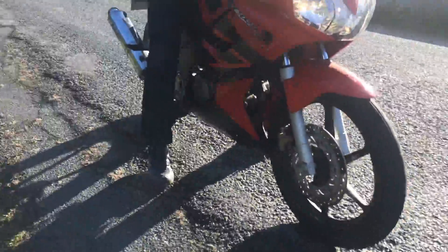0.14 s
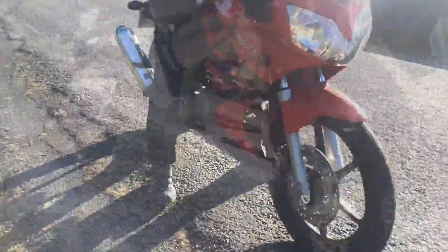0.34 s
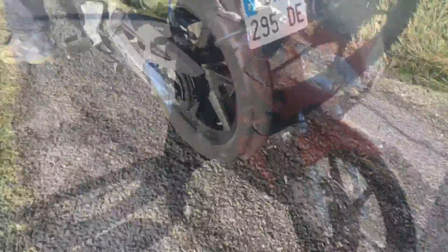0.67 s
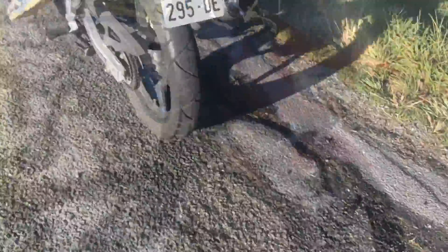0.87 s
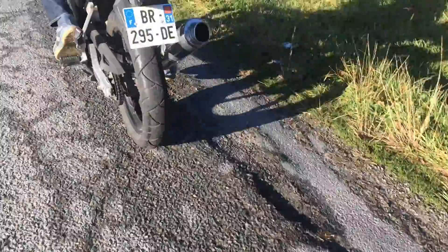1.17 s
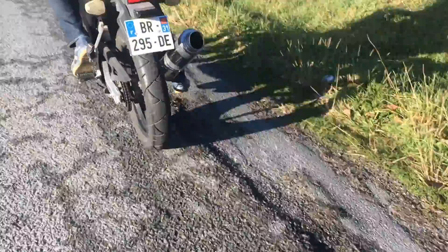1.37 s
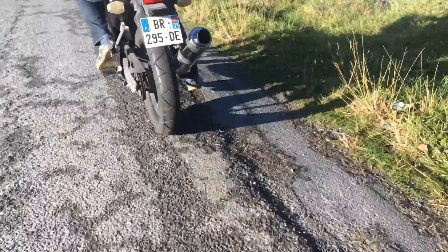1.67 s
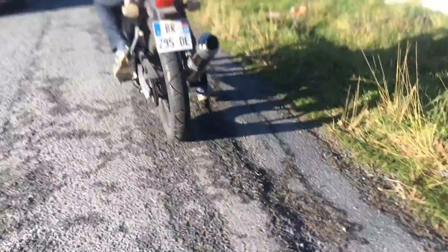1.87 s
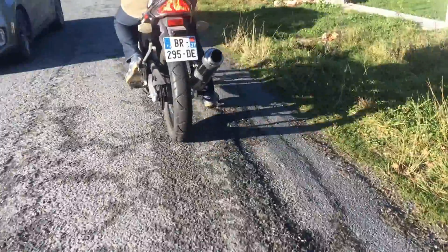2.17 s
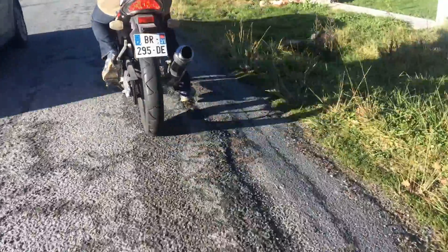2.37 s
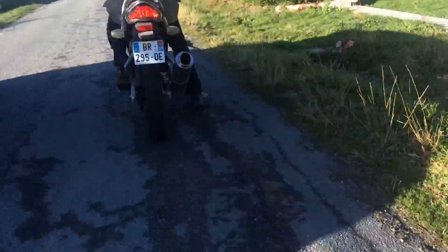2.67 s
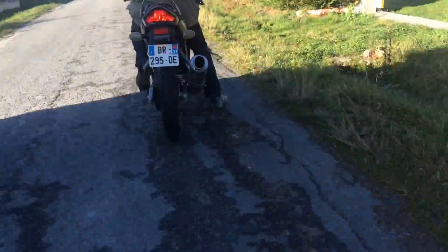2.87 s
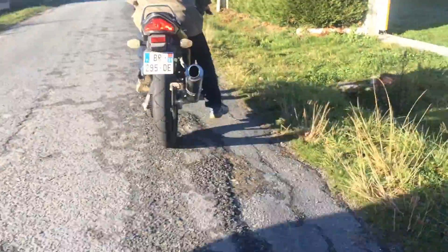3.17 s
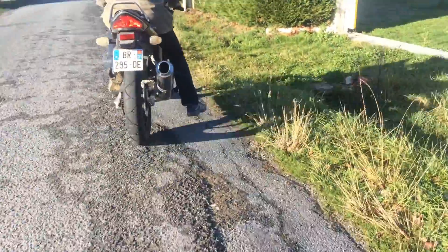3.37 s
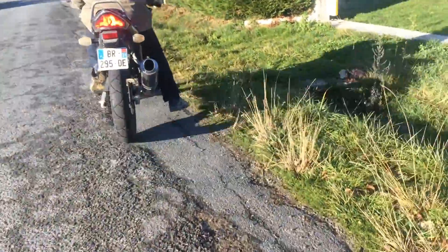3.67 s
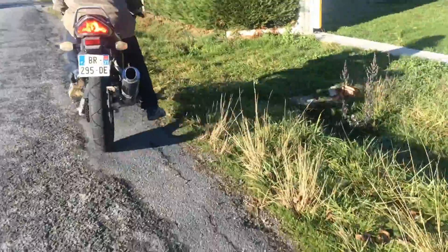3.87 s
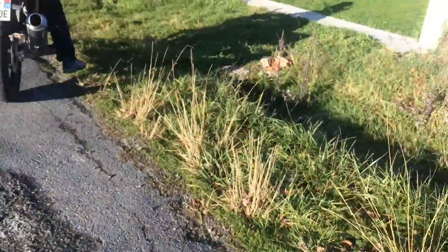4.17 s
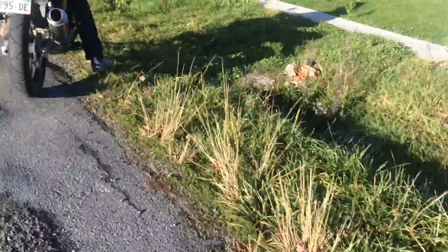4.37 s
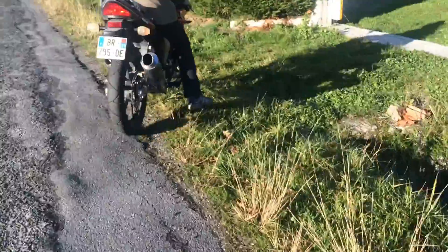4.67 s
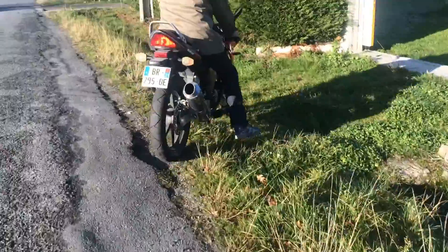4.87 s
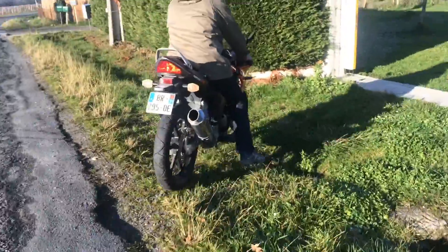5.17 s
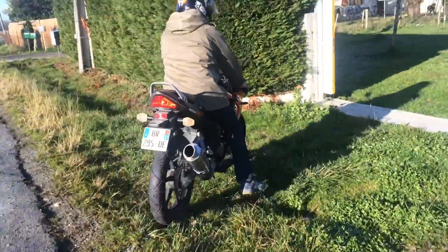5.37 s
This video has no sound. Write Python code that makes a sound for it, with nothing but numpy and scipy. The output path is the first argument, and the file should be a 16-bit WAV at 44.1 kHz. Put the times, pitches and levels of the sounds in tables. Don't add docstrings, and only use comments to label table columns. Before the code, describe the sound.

A small single-cylinder motorcycle blips its throttle up close, revs again from behind, then sinks into a slow, thumping, raspy idle as a car passes.

```python
import sys
import numpy as np
from scipy import signal
from scipy.io import wavfile
from scipy.ndimage import uniform_filter1d

SR = 44100
rng = np.random.default_rng(int(sys.argv[2]) if len(sys.argv) > 2 else 0)


def store_pcm(level_fs):
    pcm = np.round(np.clip(level_fs, -1, 1) * 32767).astype(np.int16)
    wavfile.write(sys.argv[1], SR, np.atleast_2d(pcm).T)


def field_ratio(decibels):
    return 10 ** (np.asarray(decibels, dtype=float) / 20)


N = 243873
TIME = np.arange(N) / SR


def evened(x):
    return x / np.sqrt(np.mean(x ** 2) + 1e-20)


def curve(start, rise, hold, top_db, sag_db, end, release=.01):
    t = TIME - start
    sag = sag_db * np.maximum(t - rise - hold, 0)
    let_go = np.clip((end - start - t) / release + 1, 0, 1)
    return np.clip(t / rise, 0, 1) * field_ratio(top_db - sag) * let_go


def hiss(spectrum, patchy_db, size=512):
    hz = np.fft.rfftfreq(size, 1 / SR)
    f, db = np.transpose(spectrum)
    a, b, patches = rng.standard_normal((N * 4 // size + 5, len(hz), 3)).T
    patches = uniform_filter1d(patches, size=6, axis=0)
    patches = evened(uniform_filter1d(patches, size=16, axis=1))
    colour = np.interp(np.log(hz + 1), np.log(f + 1), db, -90, -90)[:, None]
    z = (a + 1j * b) * field_ratio(colour + patchy_db * patches)
    return evened(signal.istft(z, nperseg=size, noverlap=size * 3 // 4)[1][:N])


def bursts(times, gains, rise_ms, decay_ms):
    train = np.zeros(N)
    train[np.clip(np.round(times * SR).astype(int), 0, N - 1)] = gains
    slow = np.exp(-1000 / SR / decay_ms)
    fast = slow * np.exp(-1000 / SR / rise_ms)
    return signal.lfilter([slow - fast], np.poly([slow, fast]), train)


def ring(x, hz, width):
    r = np.exp(-np.pi * width / SR)
    section = [1, 0, -1.018, 1, -2 * r * np.cos(2 * np.pi * hz / SR), r ** 2]
    return signal.sosfilt(2 * [section], x)


def add(mix, times, waves):
    for start, wave in zip(np.round(times * SR).astype(int), waves):
        mix[start:start + len(wave)] += wave


def cycle(rate, wait):
    s, hz = np.transpose(rate)
    t = np.arange(round(s[0] * SR), min(round(s[-1] * SR), N)) / SR
    return t, np.cumsum(np.interp(t, s, hz)) / SR - wait


def controls(rate, wait, rows, odd):
    t, turns = cycle(rate, wait)
    at = np.interp(np.arange(int(turns[-1]) + 1), turns, t)
    when, *columns = np.transpose(rows)
    blow_db, aside, mouth_db = (np.interp(at, when, c) for c in columns)
    s, change_db = np.transpose(odd)
    nearest = abs(at[:, None] - s).argmin(0)
    odd_db = (nearest == np.arange(len(at))[:, None]) @ change_db
    return at, blow_db + odd_db, np.clip(aside, 0, 1), mouth_db + odd_db


# Hz, level in dB, t60 in s, arrival in ms, dB change when turned aside.
PIPE_MODES = [(90, .5, .07, 7.2, 0), (136, 7.5, .042, 0, 3), (200, -9, .05, -4.7, 5),
              (292, -6, .045, -1.7, -9), (45, -24, .08, 0, 0), (153, -16, .13, 8.1, 6)]


def pipe_thump(at, blow_db, aside, detune):
    lead = 300
    out, span = np.zeros(N + 8000), np.arange(4000) / SR
    for f, db, t60, ms, turn_db in PIPE_MODES:
        pitch_luck, size_luck = rng.standard_normal((2, len(at), 1))
        w = np.maximum(span - lead / SR - ms / 1000, 0)
        pitch = f * (1 + detune * pitch_luck)
        size = field_ratio((blow_db + db + turn_db * aside)[:, None] + 1.2 * size_luck)
        swell = field_ratio(-60 * w / t60) * (1 - np.exp(-w / .009))
        add(out, at, -size * np.sin(2 * np.pi * pitch * w) * swell)
    silencer = signal.ellip(4, .3, 18, 335, fs=SR, output="sos")
    return signal.sosfiltfilt(silencer, out)[lead:lead + N]


# Hz, width in Hz, level in dB, delay in ms, decay in ms.
RASP_MODES = [(537, 103, -3.5, 6, 6.6), (737, 244, 1.5, 4, 9), (1482, 520, -5, 2, 12.5),
              (2030, 190, -11.5, 2.5, 11.7), (3150, 1150, -10, -3, 6.8)]


def engine(firings, throat, jet, uneven_db, detune):
    at, blow_db, aside, mouth_db = firings
    slower = np.log2(np.gradient(at) / .047)
    rasp_db = -36 + .25 * mouth_db + 4.5 * slower
    spit_db = -36 + .45 * mouth_db + 16 * slower
    blow_db = blow_db + uneven_db * rng.standard_normal(len(at))
    out = pipe_thump(at, blow_db, aside, detune)
    rasp_luck = rng.standard_normal((len(RASP_MODES), len(at)))
    for gas, luck, (_, _, db, ms, decay) in zip(throat, rasp_luck, RASP_MODES):
        gains = field_ratio(rasp_db + db + 1.5 * luck)
        out = out + bursts(at + (ms - 1.5) / 1000, gains, .83, decay) * gas
    spit = bursts(at - .0006, field_ratio(spit_db + 2.2 * rng.standard_normal(len(at))), .6, 1.5)
    slap = bursts(at + .0067, field_ratio(spit_db - 10 + 4 * rasp_luck[-1]), .96, 1.6)
    return out + (spit + slap) * jet


# time in seconds, firings a second.
FRONT_SPEED = [
    (0, 21.67),
    (0.13, 20.9),
    (0.2, 25.62),
    (0.3, 35.63),
    (0.45, 30.44),
    (0.65, 26.82),
    (0.9, 23.55),
    (1.21, 21.34),
]
# time in seconds, blow in dB, pipe turned aside 0-1,
# pipe mouth facing the microphone in dB.
FRONT_EXHAUST = [
    (0, 0, .3, 0),
    (.12, -1, .4, -6),
    (.2, 4.5, .5, 6),
    (.35, 1.5, .7, -8),
    (.55, -4, .4, -22),
    (.9, -3, .3, -22),
    (1.1, -4, .2, -10),
    (1.2, -19, .3, -20),
]
# time in seconds, change in dB.
FRONT_ODD_FIRINGS = [(.148, 2), (.474, -3), (.578, 3), (.65, -5), (.765, -6), (.805, -10), (.888, 5), (.93, 7),
                     (.974, -3), (1.017, 6), (1.062, -2)]


def front_engine(throat, jet):
    firings = controls(FRONT_SPEED, .172, FRONT_EXHAUST, FRONT_ODD_FIRINGS)
    return engine(firings, throat, jet, uneven_db=.8, detune=.018)


# Hz, dB per Hz.
LANE_COLOUR = [(250, -40.5), (420, -20.5), (535, 0.5), (603, -3.5), (792, -9), (893, -11.5), (1190, -11),
               (1630, -8), (2570, -13.5), (11100, -28.5), (15500, -45)]


def lane():
    return field_ratio(-48) * hiss(LANE_COLOUR, patchy_db=.7)


# Hz, dB per Hz.
WIND_COLOUR = [(15, -10), (30, 0), (60, -2), (120, -8), (300, -22), (500, -60)]


def wind():
    return field_ratio(-34) * hiss(WIND_COLOUR, patchy_db=2.5, size=2048)


# Hz, dB per Hz.
ROAR_COLOUR = [(280, -37.5), (480, -3), (571, -11.5), (690, -15), (951, -11.5), (1230, -13.5),
               (1970, -14.5), (2340, -18.5), (13200, -33.5), (15500, -36)]
# start, rise and hold in seconds,
# top in dB, sag in dB a second, end in seconds.
IDLE_SWELL = (-1, .1, 2, -41.5, 0, .2)
BLIP_SWELL = (.175, .03, .17, -31, 9.5, 1.2)
REAR_SWELL = (1.19, .01, .1, -41.5, 9, 2.6)


def roar():
    level = curve(*IDLE_SWELL) + curve(*BLIP_SWELL) + curve(*REAR_SWELL, release=.6)
    pulse = 1 + .22 * np.cos(2 * np.pi * rear_turns())
    return level * hiss(ROAR_COLOUR, patchy_db=1.2) * pulse


# Hz, dB per Hz.
CAR_COLOUR = [(240, -15), (400, -3), (600, -1.5), (832, 1.5), (1270, -2.5), (1700, -5.5), (2950, -18),
              (9830, -29), (15300, -38)]


def car():
    along = (TIME - 2.9) / .5
    distance = np.sqrt(1 + along ** 2)
    falloff = distance ** np.where(along > 0, 2.8, 1.6)
    return field_ratio(-36) / falloff * hiss(CAR_COLOUR, patchy_db=1.8)


# time in seconds, firings a second.
REAR_SPEED = [(0.2, 47.91), (0.4, 41.17), (0.85, 30.06), (1.15, 26.02), (1.75, 22.59), (2.0, 21.77),
              (2.75, 20.86), (3.0, 21.32), (3.25, 20.8), (4.1, 20.37), (4.7, 19.02), (5.12, 18.45),
              (5.3, 18.6), (5.53, 18.32)]
REAR_WAIT = .649


def rear_turns():
    t, turns = cycle(REAR_SPEED, REAR_WAIT)
    return np.interp(TIME, t, turns) - .2


# multiple of the firing rate, level in dB.
ORDERS = [(1, -9), (2, -3), (3, 1.5), (4, -2), (5, -14), (6, -22), (7, -13), (8, -17.5), (9, -22.5),
          (10, -13), (11, -24)]
# start, rise and hold in seconds, top in dB, sag in dB a second, end in seconds.
ORDER_SWELL = (.19, .02, .15, -11, 10, .9)


def overrun():
    turns = rear_turns()
    luck = np.interp(turns + .5, np.arange(200), rng.standard_normal(200))
    orders = sum(field_ratio(db) * np.cos(2 * np.pi * k * turns) for k, db in ORDERS)
    return curve(*ORDER_SWELL, release=.15) * field_ratio(3.5 * luck) * evened(orders)


# time in seconds,
# tick in dB, bang in dB.
CRACKS = [(.198, -26.5, -29), (.232, -45, -20), (0.263, -45, -18), (.291, -28, -20), (0.326, -44, -18),
          (.446, -41, -30), (0.599, -50, -17), (0.75, -26.5, -43), (0.843, -30, -42), (1.198, -23.5, -25),
          (1.440, -40, -19), (1.740, -40, -26), (2.615, -29.5, -38), (2.832, -23, -22), (3.124, -39, -29.5),
          (4.888, -42, -50), (4.937, -38, -36)]


def band_noise(order, low_hz, high_hz):
    band = signal.butter(order, [low_hz, high_hz], "band", fs=SR, output="sos")
    return evened(signal.sosfilt(band, rng.standard_normal(N)))


def pops():
    s, tick_db, bang_db = np.transpose(CRACKS)
    tick = bursts(s, field_ratio(tick_db - 4.5), .18, 2.1) * band_noise(1, 1200, 8000)
    bang = bursts(s, field_ratio(bang_db), 1.1, 4) * band_noise(2, 400, 1600)
    return tick + bang


# time in seconds, blow in dB, pipe turned aside 0-1,
# pipe mouth facing the microphone in dB.
REAR_EXHAUST = [(.2, -16, .4, 13), (.42, -20, .35, -4), (.5, -1, .28, -14), (.8, -2.5, .3, -12),
                (.95, -1, .35, 10), (1.2, 1, .5, 12), (1.4, -.5, .7, 13), (1.5, 0, .9, 11),
                (1.75, .5, .55, 9), (1.9, .5, .2, 3), (2.1, 1.5, .3, 1.5), (2.9, 0, 0, 0),
                (3.8, .3, .13, -2), (4.7, 1, .35, -2), (5.0, 1, .5, 0), (5.25, -1, 1, 3),
                (5.53, -2.5, 1, 4)]
# time in seconds, change in dB.
REAR_ODD_FIRINGS = [(.599, 3), (.627, -3), (.655, -3), (.714, -5), (.744, 2), (.807, -8), (.907, -5),
                    (1.011, -3), (1.047, -4), (1.084, -5), (1.16, 1), (1.521, -8), (1.606, -5), (1.829, -4.5)]


def rear_firings():
    return controls(REAR_SPEED, REAR_WAIT, REAR_EXHAUST, REAR_ODD_FIRINGS)


def rear_engine(throat, jet):
    return engine(rear_firings(), throat, jet, uneven_db=.6, detune=.024)


# Hz, level in dB, t60 in s, arrival in ms, slide as a share.
CAN_MODES = [(532, -2, 0.054, 6.26, 0.073), (629, -4.5, .04, 3.03, 0.23), (799, -10, 0.052, 1.87, 0.14),
             (1618, -19, 0.03, 1.977, 0.02), (1405, -16.5, 0.042, 3.03, .03)]


def can():
    at, *_, mouth_db = rear_firings()
    out, w = np.zeros(N + 8000), np.arange(3000) / SR
    for hz, db, t60, ms, slide in CAN_MODES:
        size_luck, pitch_luck = rng.standard_normal((2, len(at), 1))
        swept = w - slide * .0089 * (1 - np.exp(-w / .0036))
        size = field_ratio(-24.5 + mouth_db[:, None] + db + 1.5 * size_luck)
        pitch = hz * (1 + .015 * pitch_luck)
        swell = field_ratio(-60 * w / t60) * (1 - np.exp(-w / .004))
        add(out, at + ms / 1000, size * np.sin(2 * np.pi * pitch * swept) * swell)
    return out[:N]


# start, rise and hold in seconds, top in dB, sag in dB a second, end in seconds.
AIRBOX_SWELL = (.2, .02, .12, -22.5, 7, 1.4)


def airbox():
    at = rear_firings()[0]
    out, w = np.zeros(N + 8000), np.arange(3000) / SR
    pitch = 410 * (.03 / np.gradient(at)[:, None]) ** .3
    size = field_ratio(3.5 * rng.standard_normal((len(at), 1)))
    swell = field_ratio(6 - 60 * w / .055) * (1 - np.exp(-w / .004))
    add(out, at, size * np.sin(2 * np.pi * pitch * w) * swell)
    return curve(*AIRBOX_SWELL, release=.15) * out[:N]


# Hz, dB per Hz.
JET_COLOUR = [(2500, -40), (4000, -1.5), (5500, -6), (7000, 1), (9000, -3.5), (12000, -3.5), (15500, -10)]


def scene():
    gas = rng.standard_normal(N)
    jet = hiss(JET_COLOUR, patchy_db=1.6, size=256)
    throat = [evened(ring(gas, hz, width)) for hz, width, *_ in RASP_MODES]
    machine = front_engine(throat, jet) + roar() + overrun() + rear_engine(throat, jet) + can() + airbox()
    return (machine + pops() + lane() + wind() + car())[None]


def low_pass(x):
    return signal.sosfilt(signal.butter(12, 15740, fs=SR, output="sos"), x)


def record(dry):
    cut = signal.sosfilt(signal.butter(1, 18, "high", fs=SR, output="sos"), dry)
    edge = signal.firwin(255, 15450, window=("kaiser", 8), fs=SR)
    dulled = signal.oaconvolve(np.clip(cut, -1, 1), edge[None], "same")
    faded = dulled * np.clip((N - np.arange(N)) / 40, 0, 1)
    return low_pass(faded)


dry = scene()
out = record(dry)
store_pcm(out)
```